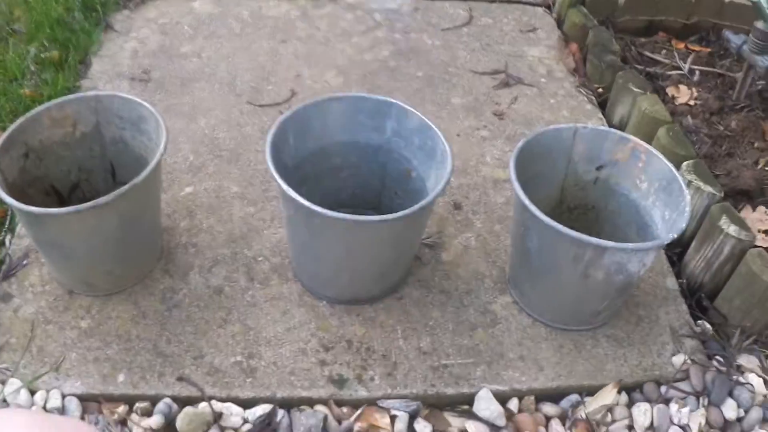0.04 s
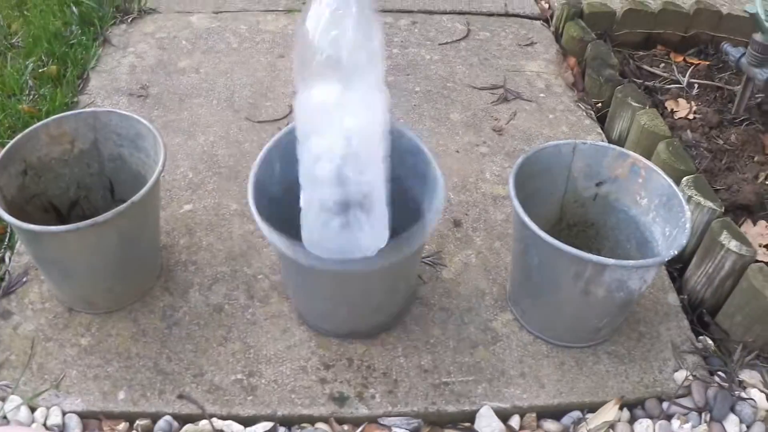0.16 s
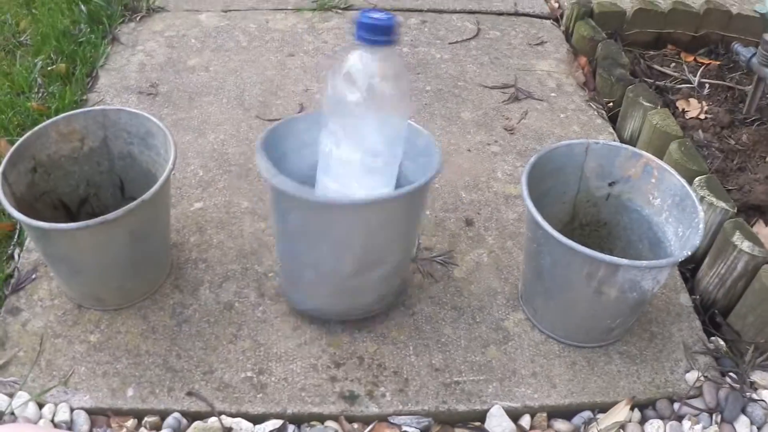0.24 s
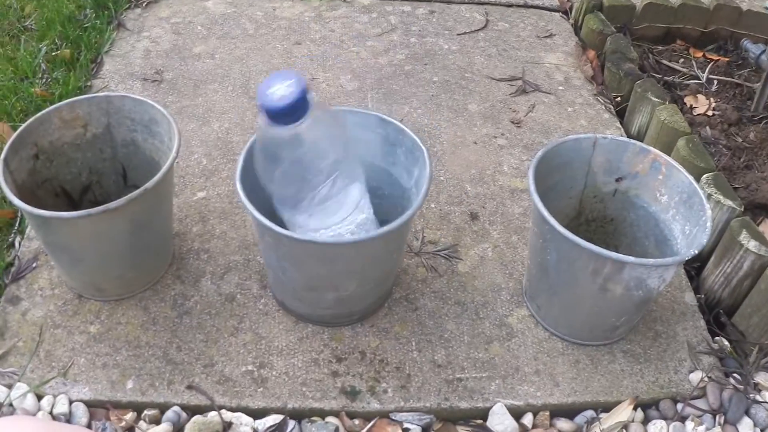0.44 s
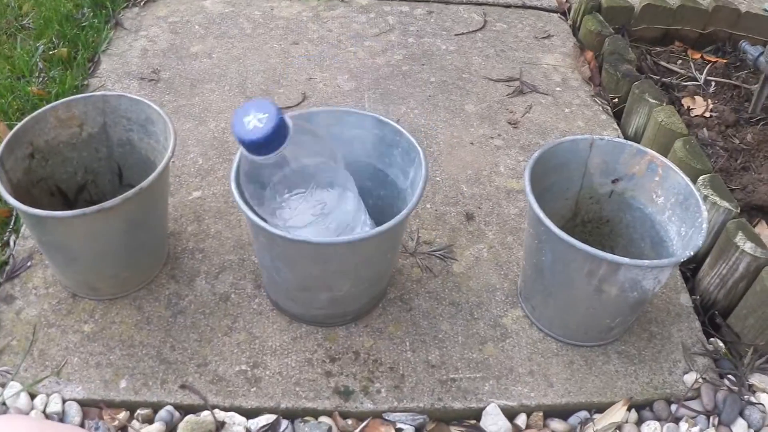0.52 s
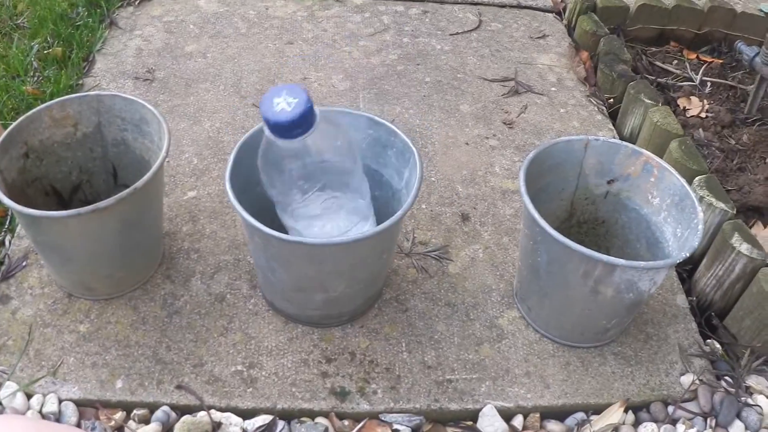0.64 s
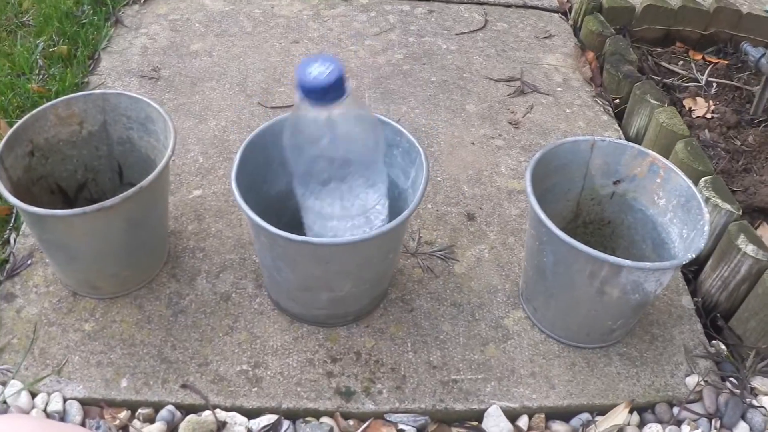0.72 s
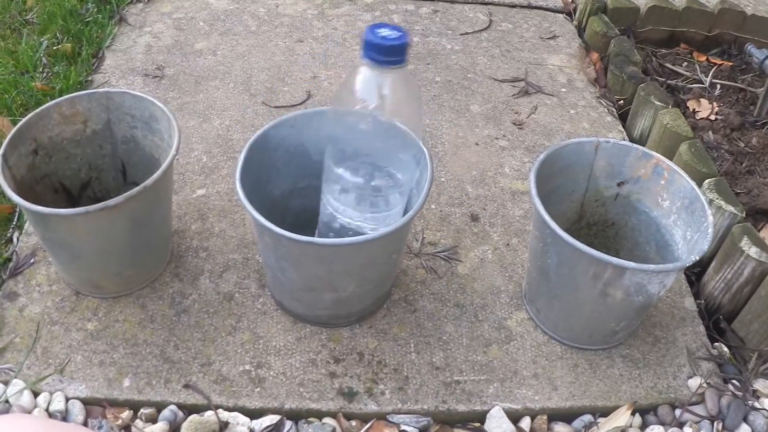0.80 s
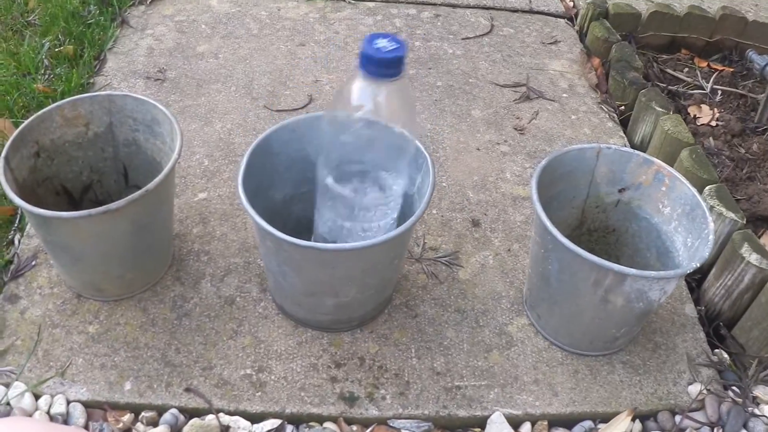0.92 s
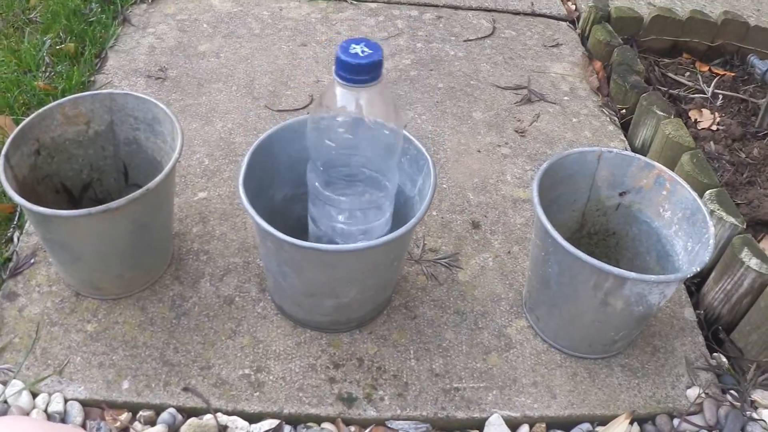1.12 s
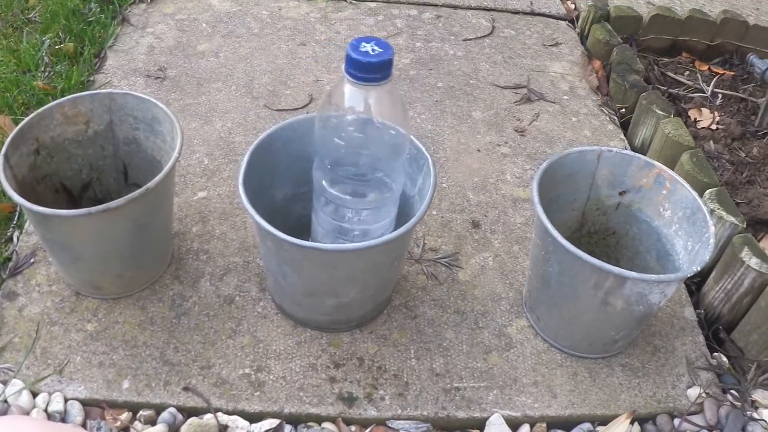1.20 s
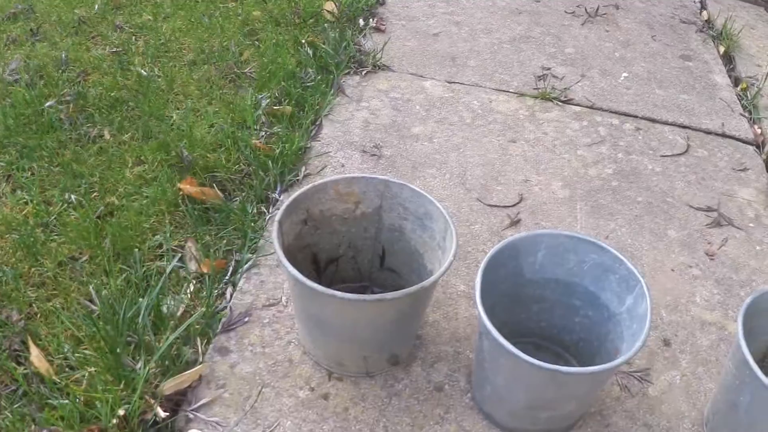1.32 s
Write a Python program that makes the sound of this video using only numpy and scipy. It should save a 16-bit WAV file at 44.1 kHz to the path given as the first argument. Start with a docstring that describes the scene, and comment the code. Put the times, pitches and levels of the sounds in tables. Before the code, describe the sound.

Part-filled plastic bottle clatters into a steel bucket outdoors, then scrapes and rocks to rest.

```python
"""Bottle flip into a steel bucket

A part-filled plastic bottle crinkles and hums as it leaves the hand, then crashes into a small
steel bucket on paving, close by. Each hit thumps the bottle, cracks its plastic and rings the steel.
It rattles between base and wall, slides upright and rocks to rest as its water slops.
The yard echoes briefly, and a little wind touches the microphone."""
import sys
import numpy as np
from scipy import signal
from scipy.fft import rfft, irfft, next_fast_len
from scipy.io import wavfile

SR = 44100
rng = np.random.default_rng(int(sys.argv[2]) if len(sys.argv) > 2 else 0)


def digitize_waveform(pressure):
    """Quantize a signal to 16-bit integers and store it at the path in sys.argv[1].

    Rows of a 2-D input are taken as channels; values are limited to [-1, 1].
    """
    field = np.atleast_2d(pressure).T
    bounded = np.clip(field, -1, 1)
    quanta = np.round(bounded * 32767).astype(np.int16)
    wavfile.write(sys.argv[1], SR, quanta)


N = 59535


# Hits of bottle on bucket: t/s, crack/dB, thump/dB, base/dB, wall/dB, tick/dB, contact fade/s
# A fade is the time to die away by 60 dB; a short contact clacks, a long one skids.
HITS = [(0.2325, 2.5, -10.5, -13.5, -13, -16.5, 0.039), (0.2419, -2.5, -18, -13, -21, -25, 0.04),
        (0.2541, -2, -19.5, -22, -18, -29, 0.049), (0.2664, -0.5, -18, -45, -10, -19.5, 0.054),
        (0.2715, -1.5, -19, -33, -17, -15.5, 0.044), (0.2874, -9.5, -25, -7.5, -15, -20, 0.053),
        (0.3034, -14, -22.5, -27, -22.5, -35, 0.065), (0.3189, -6.5, -20.5, -13, -13.5, -20.5, 0.071),
        (0.3303, -5, -17.5, -18.5, -20.5, -27, 0.034), (0.3422, -9.5, -24, -13, -17.5, -23.5, 0.045),
        (0.35, -13.5, -15, -11.5, -14, -25, 0.052), (0.3575, -12, -28, -19, -16, -40, 0.059),
        (0.3714, -19, -39, -22, -30, -32, 0.052), (0.379, -12.5, -21, -25, -22, -21.5, 0.063),
        (0.3912, -15, -21, -12.5, -25, -38, 0.065), (0.4194, -22, -31, -15.5, -33, -41, 0.079),
        (0.4339, -13, -31, -26, -17.5, -24.5, 0.046), (0.4424, -16, -26, -7, -17.5, -28, 0.027),
        (0.4534, -27, -31, -13.5, -20.5, -34.5, 0.055), (0.4664, -19.5, -20, -33, -21, -24, 0.072),
        (0.487, -17, -54, -27, -25, -36, 0.035), (0.4993, -28, -27, -6.5, -19.5, -31, 0.045),
        (0.5072, -12.5, -45, -19.5, -20.5, -40, 0.062), (0.5327, -11, -43, -10, -13, -21.5, 0.042),
        (0.5423, -9, -19.5, -19.5, -16.5, -23, 0.051), (0.5704, -18.5, -27.5, -17, -20.5, -44, 0.048),
        (0.595, -10, -32, -17.5, -26.5, -25, 0.047), (0.63, -27, -26.5, -25.5, -31.5, -45, 0.053),
        (1.0458, -44, -42.5, -44, -41.5, -57, 0.075), (1.0777, -36.5, -43, -53, -66, -56, 0.04),
        (1.1031, -43, -56, -48, -56, -52, 0.04), (1.1364, -40, -58, -48, -62, -67, 0.04),
        (1.1622, -47, -49, -40, -52, -81, 0.04), (1.205, -33.5, -67, -58, -54, -48.5, 0.047)]
def clatter():
    """Every hit sounds the bottle and the bucket together, each time in a different mix."""
    out = np.zeros((2, N))
    for s, crack_db, thump_db, base_db, wall_db, tick_db, contact_t60 in HITS:
        add(out, s, amp(thump_db) * bottle_thump())
        add(out, s, amp(base_db) * bucket_base())
        add(out, s, amp(wall_db) * bucket_wall(contact_t60))
        add(out, s, amp(crack_db) * plastic_crack(contact_t60))
        add(out, s, amp(tick_db) * treble_tick(contact_t60))
    return out


# Notes of the water-filled bottle: f/Hz, level/dB, fade/s
BOTTLE_NOTES = [(232, 0, .09), (269, 1, .16), (296, -9, .36), (394, -9, .1), (484, -9, .12)]
# Dull noise of the hit: f/Hz, level/dB
THUMP_NOISE = [(30, -53), (80, -26), (180, -2), (400, 3.5), (600, 1.5), (1000, -29), (2500, -66)]
def bottle_thump():
    """Heavy with water, the bottle gives a low thump."""
    notes = amp(5.5) * ring(BOTTLE_NOTES, attack=0.0052, scatter_db=1.9, detune=0.01, spread=0.025)
    return notes + amp(-4.5) * noise(THUMP_NOISE, side_db=-18) * fade(0.066, 0.002)


# Notes of the bucket's base: f/Hz, level/dB, fade/s
BASE_NOTES = [(641, -4, 0.075), (665.2, 2, 0.14), (684.8, -10.5, 0.36), (733, 0, .1), (765, -9.5, 0.23),
              (801, -9.5, 0.19)]
def bucket_base():
    """The struck steel base rings with a few close notes."""
    return amp(0.5) * ring(BASE_NOTES, attack=0.0018, scatter_db=2.5, detune=0.01, spread=0.25)


# Notes of the bucket's wall: f/Hz, level/dB, fade/s
WALL_NOTES = [(1064, -3, .16), (1121, -3, .2), (1240, -11, .52), (1422, -11, .58), (1483, -5, .2),
              (1573, -4, .13), (1735, -11, .6), (1939, -15, .68), (2045, -6, .18), (2082, -13, .42),
              (2300, -7, .16), (2342, -13, .45), (2428, -14, .68), (2640, -7, .13)]
# Noise of the clank: f/Hz, level/dB
CLANK_NOISE = [(300, -37), (600, -1.5), (1000, 5), (1500, 3), (2300, -1.5), (2900, -1.5), (4200, -10),
               (8000, -65)]
def bucket_wall(contact_t60):
    """The steel wall clanks on contact and rings on briefly."""
    notes = amp(-5) * ring(WALL_NOTES, attack=0.00029, scatter_db=4, detune=0.00099, spread=0.28)
    loudness = fade(contact_t60, 0.0002) + amp(-22.5) * fade(0.55, 0.003)
    return notes + amp(-1) * noise(CLANK_NOISE, side_db=-15.5) * loudness


# Notes of the plastic shell: f/Hz, level/dB, fade/s
SHELL_NOTES = [(3062, -2, .15), (3448, 1, .18), (3620, -3, .14), (3750, -11, .22), (3866, -3, .17),
               (4120, -3, .14), (4298, -2, .14), (4538, -1, .13), (4900, -5, .08), (5480, -6, .08),
               (5785, -4, .1), (6600, -7, .08), (7390, -8, .08), (8500, -12, .08)]
# Noise of the crack: f/Hz, level/dB
CRACK_NOISE = [(700, -43), (2000, -8), (3000, 1.5), (4200, -0.5), (5600, -1.5), (7000, -4.5), (9000, -45),
               (16000, -48)]
def plastic_crack(contact_t60):
    """The thin shell rings high and crackles as it buckles."""
    notes = amp(-15) * ring(SHELL_NOTES, attack=0.0005, scatter_db=4, detune=0.002, spread=0.08)
    burst = amp(-10) * noise(CRACK_NOISE, side_db=-23) * fade(contact_t60, 0.00037)
    return notes + burst * crackle(rough_db=3.5, rate=870)


# Highest noise of a hit: f/Hz, level/dB
TICK_NOISE = [(2500, -37), (5500, 1), (7200, 1), (9500, 1.5), (11500, -4.5), (14000, -8), (16000, -13)]
def treble_tick(contact_t60):
    """A bright, slightly rough tick tops the contact."""
    burst = amp(1.5) * noise(TICK_NOISE, side_db=-9.5) * fade(contact_t60, 0.0008)
    return burst * crackle(rough_db=1, rate=940)


# Square hits: t/s, f/Hz, level/dB, fade/s
SQUARE_HITS = [(0.271, 2060, -7.5, 0.029), (0.288, 769, -1, 0.05), (0.292, 3073, -6.5, 0.073),
               (0.435, 727, -8.5, 0.097), (0.501, 1479, -10.5, 0.13), (0.531, 1512, -4, 0.061),
               (0.531, 2250, -6, 0.024), (0.594, 3010, -21.5, 0.034), (0.595, 8600, -29.5, 0.067),
               (1.047, 756, -36, 0.074), (1.102, 1490, -36.5, 0.058), (1.162, 1433, -42, .1)]
def pings():
    """A hit that lands squarely makes one note sing out."""
    return mix((s, tone(hz, db, t60, attack=0.001)) for s, hz, db, t60 in SQUARE_HITS)


# Thuds on the ground: t/s, level/dB
PAVING_THUDS = [(0.235, -19.5), (0.264, -16), (0.318, -30), (0.342, -37), (0.382, -34)]
def thuds():
    """The bottle's weight presses the bucket onto the paving."""
    return mix((s, tone(hz=118, db=db, t60=0.1, attack=0.008)) for s, db in PAVING_THUDS)


# Crinkles in the hand and in flight: t/s, snap/dB, rustle/dB
CRINKLE_SNAPS = [(0.0350, -21, -39), (0.0393, -18.5, -33.5), (0.0429, -31, -42), (0.0724, -30, -40),
                 (0.0754, -37, -45), (0.095, -34, -57), (0.102, -32.5, -55), (0.1414, -45, -58),
                 (0.1665, -34.5, -47)]
# Noise of a crinkle: f/Hz, level/dB
CRINKLE_NOISE = [(200, -16), (800, -8.5), (1350, -2.5), (1650, -15.5), (2050, -3), (2700, -5.5),
                 (5000, -10), (9000, -14), (16000, -25)]
def crinkles():
    """The thin plastic snaps back from the grip; a rustle follows each snap."""
    out = np.zeros((2, N))
    for s, snap_db, rustle_db in CRINKLE_SNAPS:
        loudness = amp(snap_db) * fade(0.018, 0.00017) + amp(rustle_db) * fade(0.28, 0.0037)
        add(out, s, noise(CRINKLE_NOISE, side_db=-7.5) * loudness * crackle(rough_db=3.5, rate=700))
    return out


# When the dent pops: t/s, level/dB
DENT_POPS = [(0.0396, -14.5)]
# Notes of the dent: f/Hz, level/dB, fade/s
DENT_NOTES = [(1202, -6, 0.035), (1407, 1, 0.023), (2050, -2.5, 0.026), (2780, -13, 0.018)]
def dent_pop():
    """The dent under the fingers pops out and rings for an instant."""
    return mix((s, amp(db) * ring(DENT_NOTES, attack=0.00027, scatter_db=-2, detune=0.0045, spread=0.2))
               for s, db in DENT_POPS)


# Low notes of the flying bottle: t/s, f/Hz, level/dB, fade/s
HUM_NOTES = [(0.042, 203, -23, 0.16), (.045, 226.4, -37.5, 0.99)]
def hum():
    """Once let go, the bottle hums as it flies."""
    return mix((s, tone(hz, db, t60, attack=0.0021)) for s, hz, db, t60 in HUM_NOTES)


# Slides along the wall: t/s, level/dB
WALL_SLIDES = [(.856, -29.5), (.877, -28.5)]
# Noise of the scrape: f/Hz, level/dB
SCRAPE_NOISE = [(240, -65), (400, -0.5), (465, -19), (768, -4.5), (921, -18), (1410, -1), (1570, -5.5),
                (2660, -10.5), (3010, -14), (3550, -6), (5030, -15.5), (5680, -9.5), (6320, -19.5),
                (7810, -18.5), (15000, -31.5)]
def slides():
    """The bottle scrapes upright, and the bucket's base rings with it."""
    out = np.zeros((2, N))
    loudness = fade(0.066, 0.0022) + amp(-10.5) * fade(0.27, 0.016)
    for s, db in WALL_SLIDES:
        scrape = noise(SCRAPE_NOISE, side_db=-14.5) * loudness
        base = amp(5.5) * ring(BASE_NOTES, attack=0.041, scatter_db=1.5, detune=0.011, spread=0.24)
        add(out, s, amp(db) * (scrape + base))
    return out


# Slops of water: t/s, f/Hz, level/dB
WATER_SLOPS = [(.887, 272, -12), (1.062, 282.4, -26.5), (1.17, 262, -26.5), (1.207, 277.6, -26.5)]
def slops():
    """Water swings against the bottle's side with a soft, low note."""
    return mix((s, tone(hz, db, t60=0.089, attack=0.019)) for s, hz, db in WATER_SLOPS)


# Small bubbles: t/s, starting f/Hz, level/dB
WATER_BUBBLES = [(1.181, 3500, -40.5), (1.191, 3000, -44), (1.226, 3680, -55)]
def bubbles(rise_per_s=1.3):
    """Each bubble in the shaken water rings with a slightly rising pitch."""
    out = np.zeros((2, N))
    for s, hz, db in WATER_BUBBLES:
        phase = 2 * np.pi * hz * age() * (1 + rise_per_s * age() / 2)
        add(out, s, amp(db) * np.sin(phase) * fade(0.06, 0.002))
    return out


# How long the yard echoes: f/Hz, fade/s
YARD_FADES = [(150, 0.083), (1000, 0.44), (4000, 0.19), (12000, 0.42)]
def yard(sound):
    """Paving and edging throw back early echoes, then a faint wash of later ones."""
    def echo(response):
        return signal.fftconvolve(sound, response / np.linalg.norm(response[0]), axes=1)[:, :N]

    hz, t, bands = signal.stft(rng.standard_normal((2, SR // 2)), SR, nperseg=256)
    decay = amp(-60 * t / along(YARD_FADES, hz)[:, None])
    tail = signal.istft(bands * decay, SR, nperseg=256)[1]
    early = rng.standard_normal((2, len(age()))) * fade(0.062, 0.0012)
    return amp(-14) * echo(tail) + amp(-20) * echo(early)


# Rise and fall of the wind: t/s, relative level/dB
GUSTS = [(0.0, -59), (0.03, -60), (0.184, -57.5), (0.24, -43), (0.282, -44), (0.296, -55), (0.506, -64),
         (0.702, -55.5), (0.864, -42), (1.018, -46.5), (1.082, -34.5), (1.252, -52), (1.334, -33),
         (1.35, -42)]
# Rumble of the wind: f/Hz, level/dB
WIND_NOISE = [(20, -10), (50, -6.5), (95, 3.5), (130, -1), (200, -5), (400, -24), (1000, -64)]
def wind():
    """Light gusts rumble on the microphone."""
    s, db = np.transpose(GUSTS)
    gust = amp(np.interp(np.arange(N) / SR, s, db) - 4)
    return gust * noise(WIND_NOISE, side_db=-6.5, size=N)


# Hush of the open air: f/Hz, level/dB
AIR_NOISE = [(88, -34), (150, -5.5), (280, 3), (578, -11.5), (730, -4.5), (871, -13), (1210, -10),
             (3040, -17), (3770, -18.5), (10000, -25), (16000, -39)]
def air():
    """A soft, steady hush lies behind everything."""
    return amp(-47) * noise(AIR_NOISE, side_db=-7.5, size=N)


def amp(db):
    """Turn decibels into a gain."""
    return 10 ** (np.asarray(db) / 20)


def unit(x):
    """Scale to an average strength (rms) of 1."""
    return x / np.sqrt(np.mean(x ** 2) + 1e-20)


def along(points, hz):
    """Read between (f/Hz, value) points on a log frequency axis."""
    f, values = np.transpose(points)
    return np.interp(np.log(hz + 1), np.log(f + 1), values)


def age():
    """Seconds since a sound began, up to 0.7."""
    return np.arange(int(0.7 * SR)) / SR


def fade(t60, attack):
    """Rise over about attack seconds; fall by 60 dB every t60 seconds."""
    return np.exp(-np.log(1000) * age() / t60) * (1 - np.exp(-age() / attack))


def add(track, s, sound):
    """Mix a sound in at s seconds."""
    part = track[:, max(0, round(s * SR)):]
    part[:, :sound.shape[-1]] += sound[..., :part.shape[1]]


def mix(events):
    """Lay (t/s, sound) pairs on one stereo track."""
    out = np.zeros((2, N))
    for s, sound in events:
        add(out, s, sound)
    return out


def noise(spectrum, side_db, size=None):
    """Stereo noise shaped by a table; a higher side_db makes it wider."""
    size = size or len(age())
    m = next_fast_len(size)
    colour = amp(along(spectrum, np.fft.rfftfreq(m, 1 / SR)))
    mid, side = irfft(rfft(rng.standard_normal((2, m))) * colour, m)[:, :size]
    return unit(np.array([mid + amp(side_db) * side, mid - amp(side_db) * side]))


def ring(notes, attack, scatter_db, detune, spread):
    """An object's fading notes; each hit varies their level, pitch and left-right balance."""
    hz, db, t60 = np.transpose(notes)
    level, pitch, pan = rng.standard_normal((3, len(hz)))
    gain = amp(db + scatter_db * level)
    tuned_hz = hz * (1 + detune * pitch)
    waves = np.sin(2 * np.pi * tuned_hz[:, None] * age()) * fade(t60[:, None], attack)
    ears = np.array([1 + spread * pan, 1 - spread * pan])
    return ears * gain / np.linalg.norm(gain) @ waves


def tone(hz, db, t60, attack):
    """One fading note."""
    return amp(db) * np.sin(2 * np.pi * hz * age()) * fade(t60, attack)


def crackle(rough_db, rate):
    """Thin plastic buckles in tiny jerks: a gain that wavers at random, rate times a second."""
    jerks = rng.standard_normal(4096)
    return unit(amp(rough_db * np.interp(age() * rate, np.arange(len(jerks)), jerks)))


def scene():
    """The bottle is thrown, crashes and settles in the open air."""
    throw = crinkles() + dent_pop() + hum()
    crash = clatter() + pings() + thuds()
    settling = slides() + slops() + bubbles()
    bottle = throw + crash + settling
    return bottle + yard(bottle) + wind() + air()


def record(dry):
    """Round off the highest peaks and cut everything above 16 kHz."""
    rounded = dry / (1 + np.abs(dry) ** 6) ** (1 / 6)
    m = next_fast_len(N + SR // 2)
    return irfft(rfft(rounded, m) * (np.fft.rfftfreq(m, 1 / SR) < 16000), m)[:, :N]


dry = scene()
out = record(dry)
digitize_waveform(out)
```